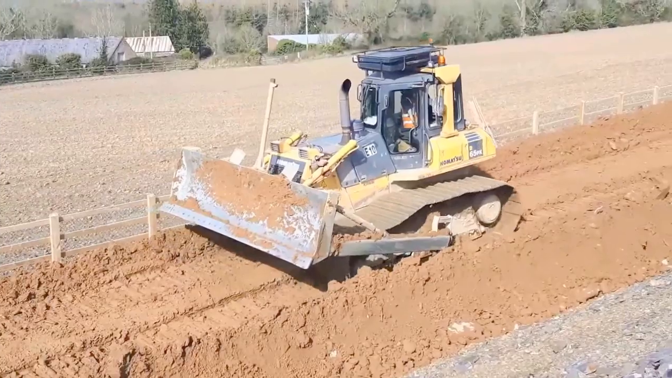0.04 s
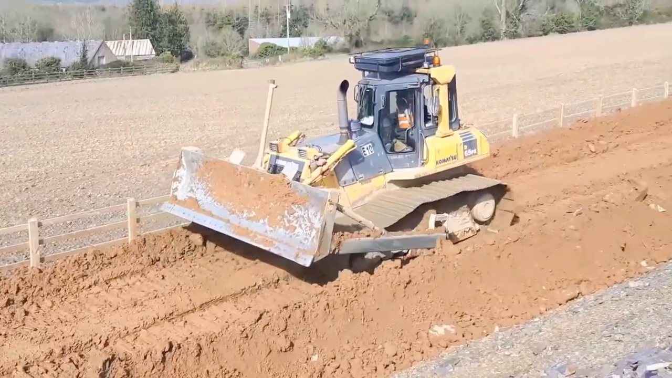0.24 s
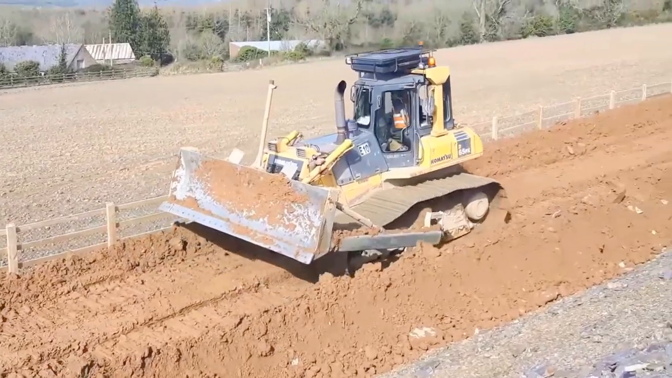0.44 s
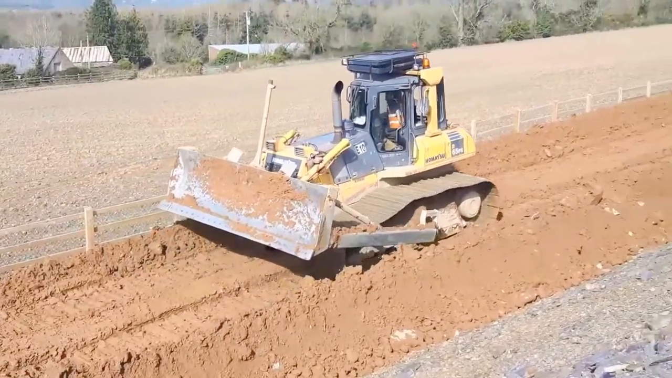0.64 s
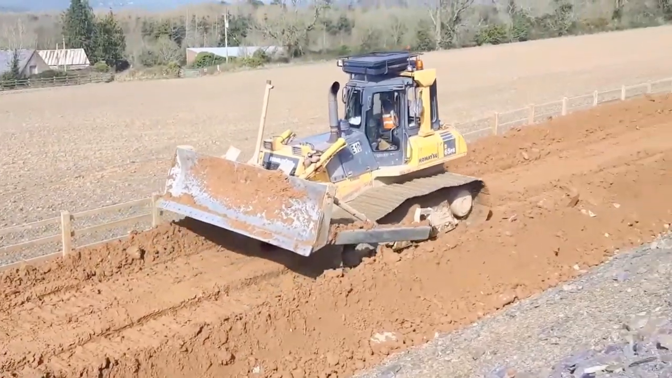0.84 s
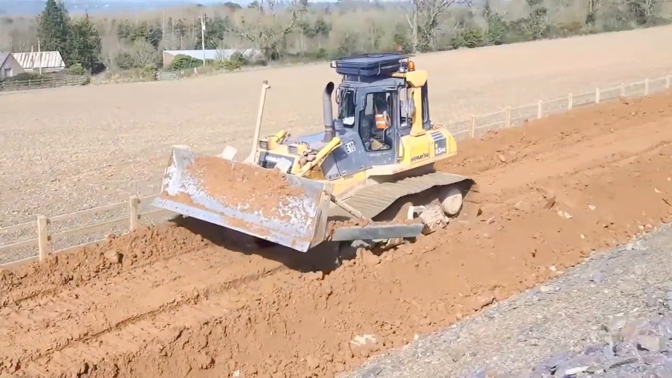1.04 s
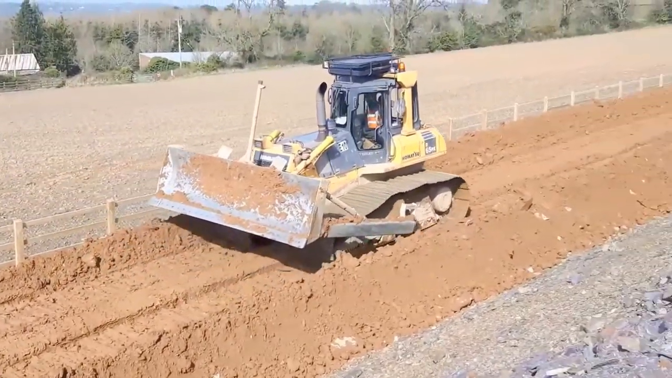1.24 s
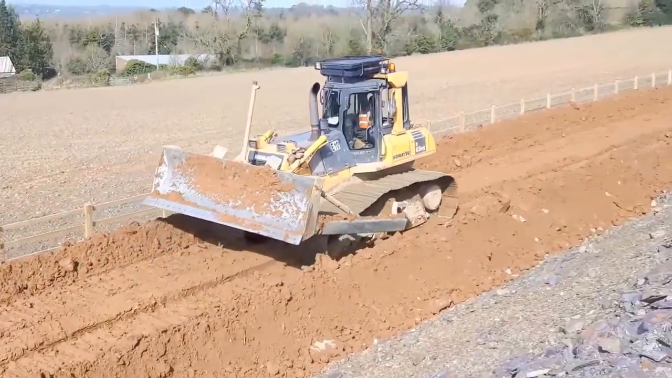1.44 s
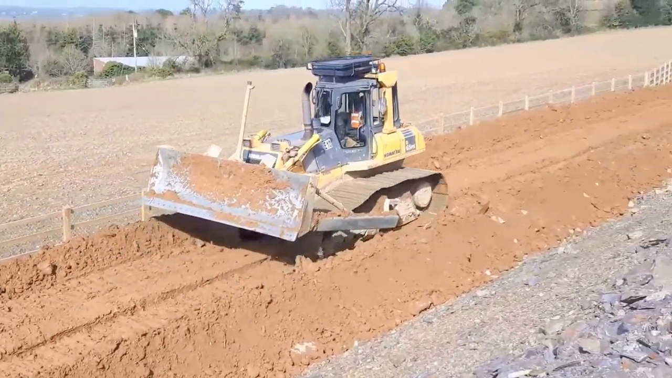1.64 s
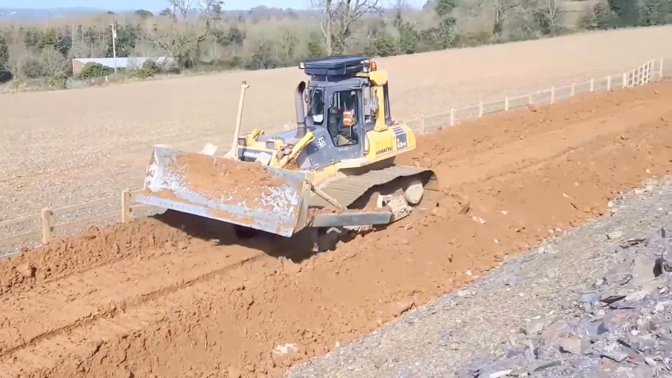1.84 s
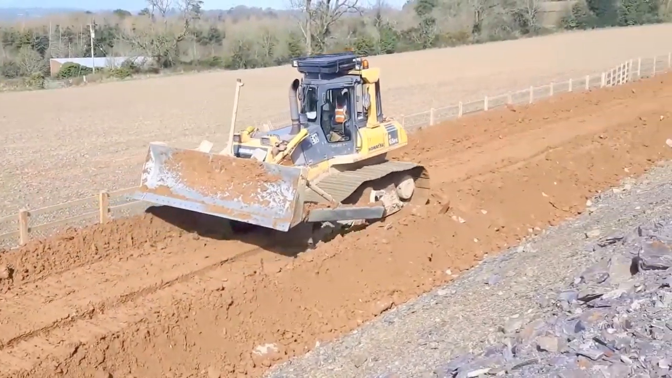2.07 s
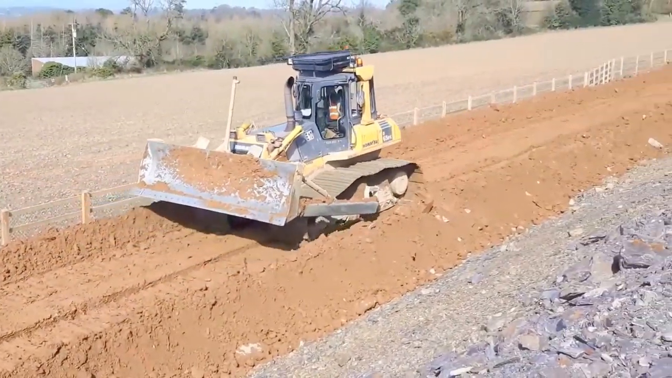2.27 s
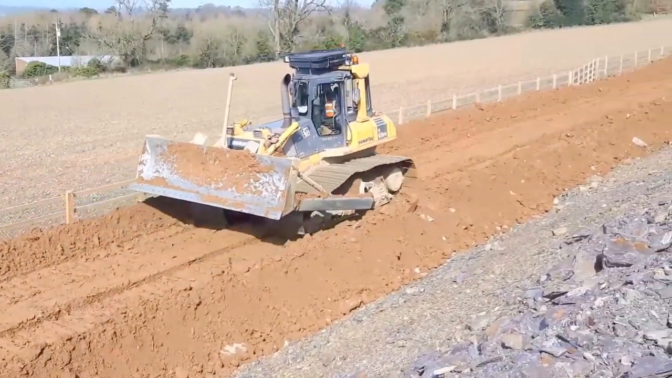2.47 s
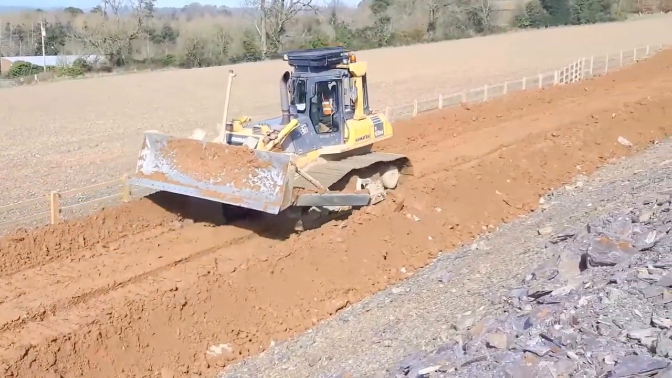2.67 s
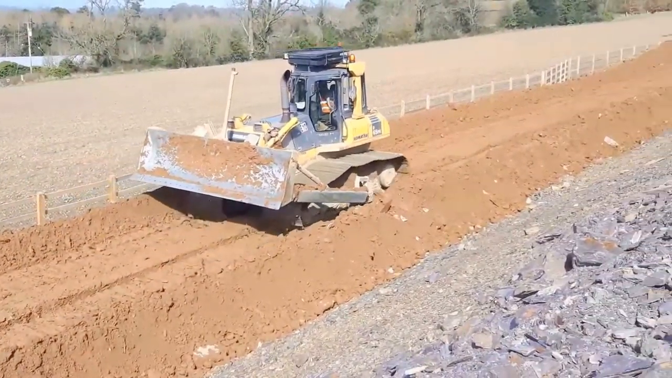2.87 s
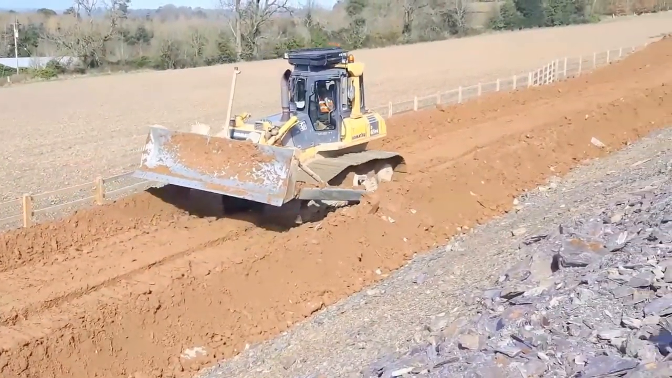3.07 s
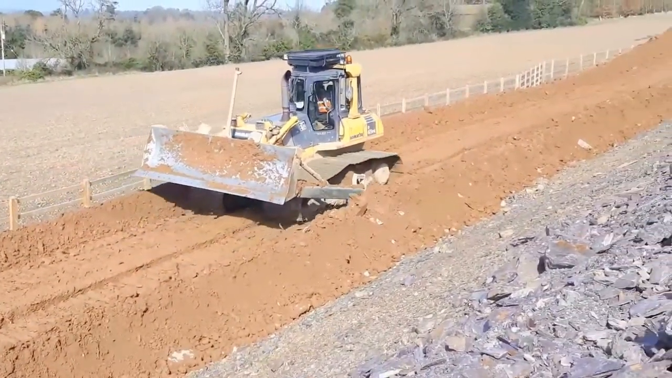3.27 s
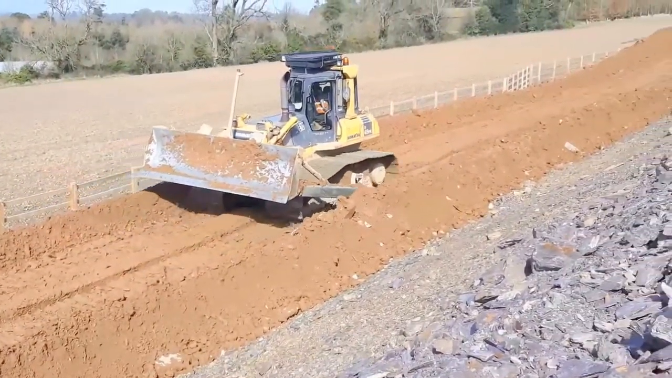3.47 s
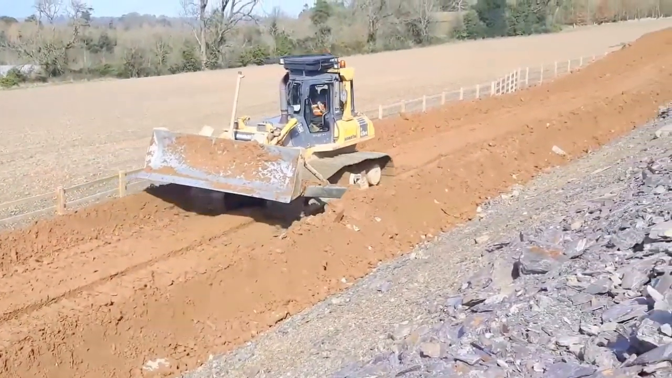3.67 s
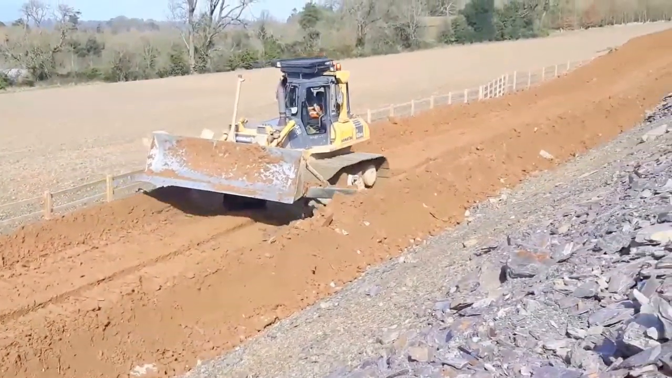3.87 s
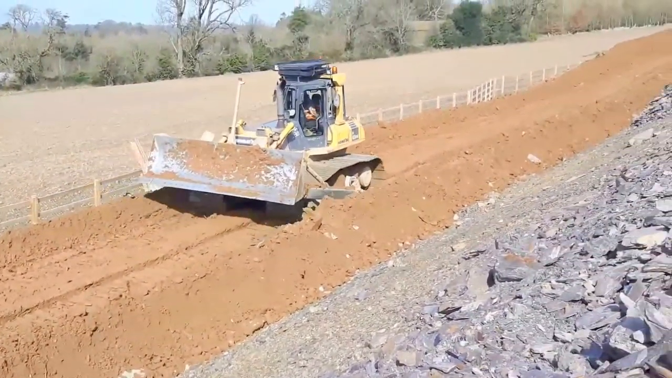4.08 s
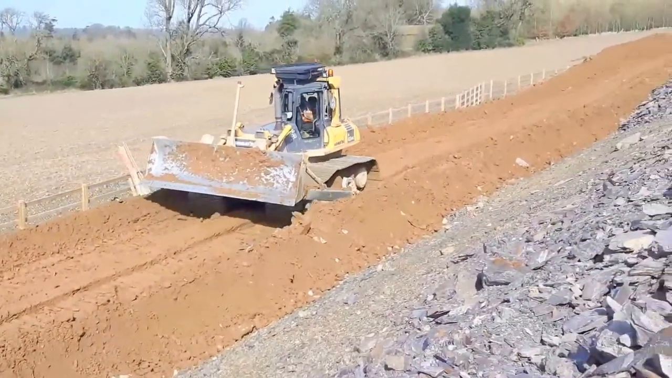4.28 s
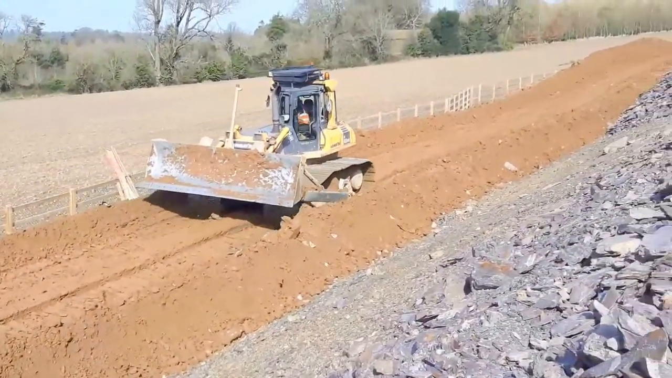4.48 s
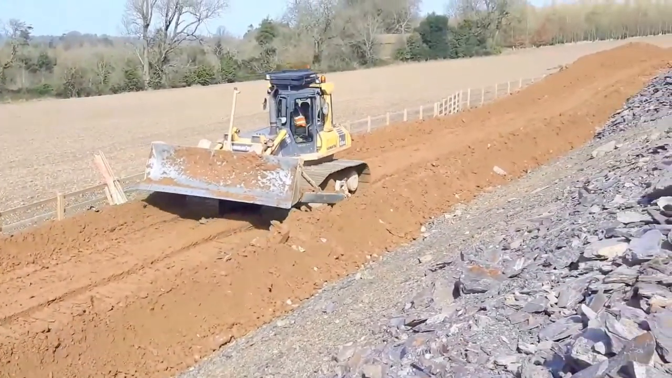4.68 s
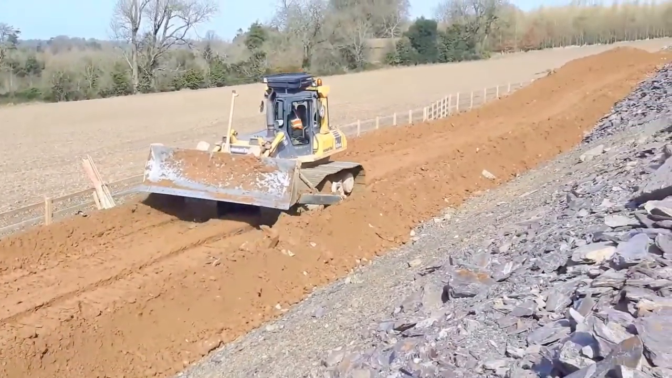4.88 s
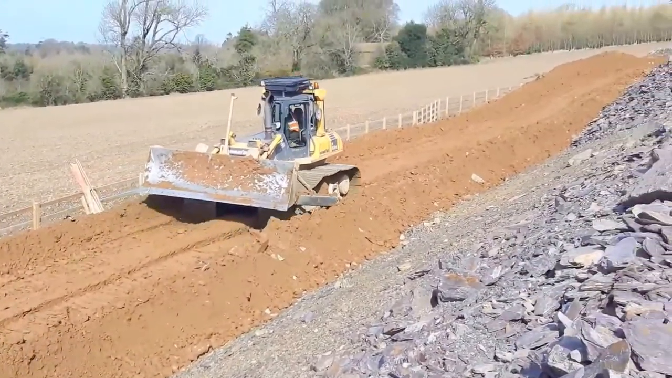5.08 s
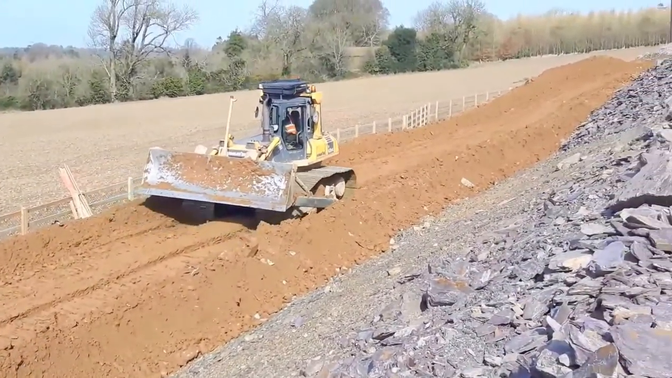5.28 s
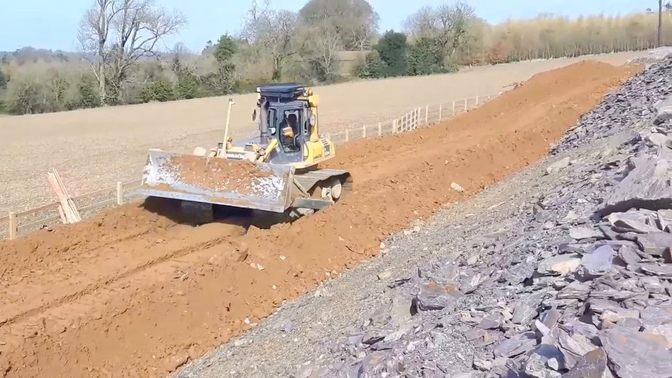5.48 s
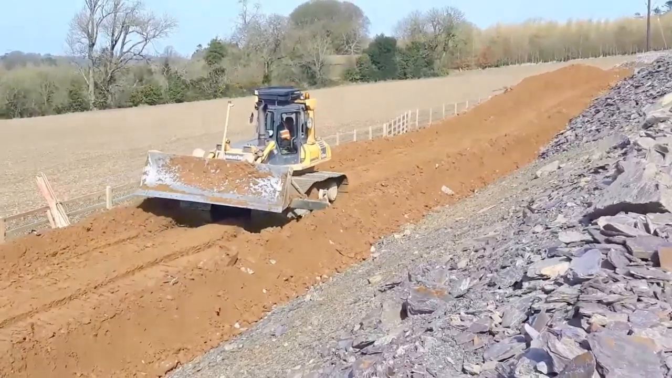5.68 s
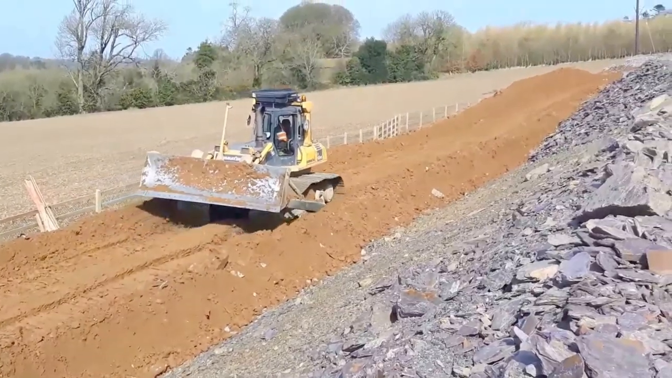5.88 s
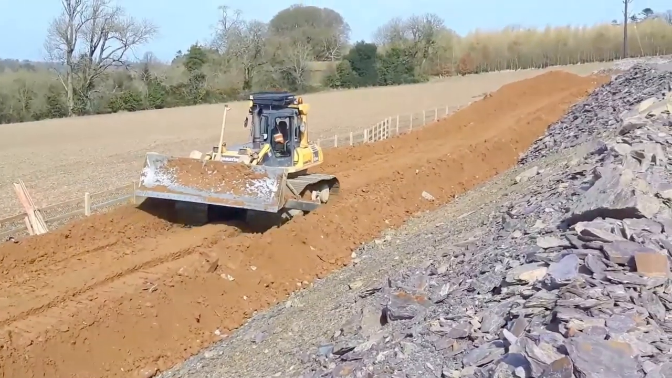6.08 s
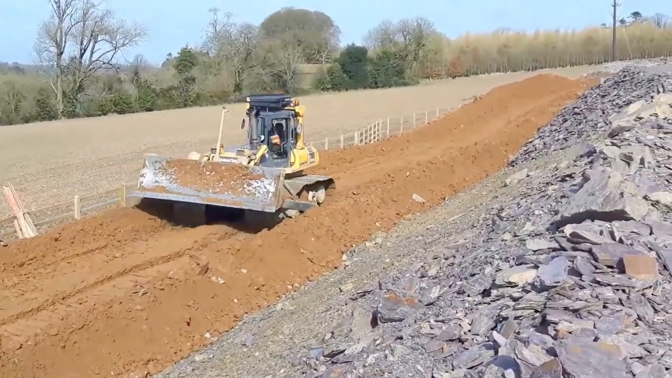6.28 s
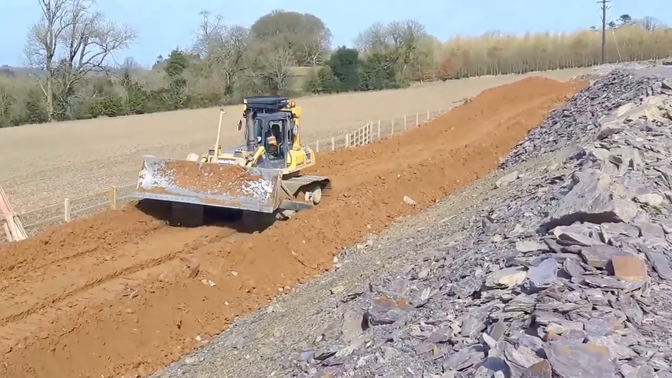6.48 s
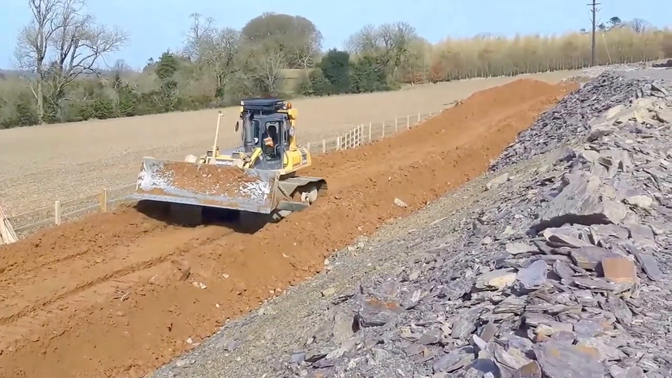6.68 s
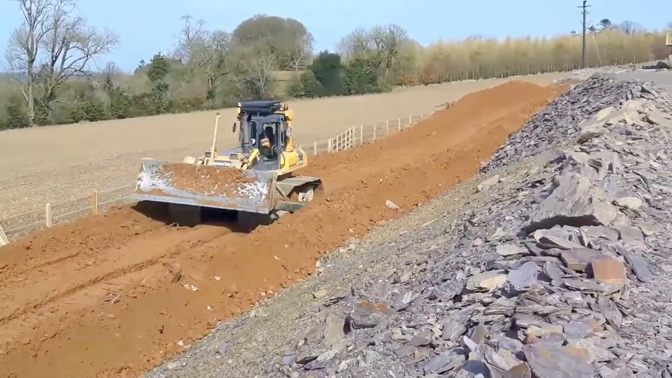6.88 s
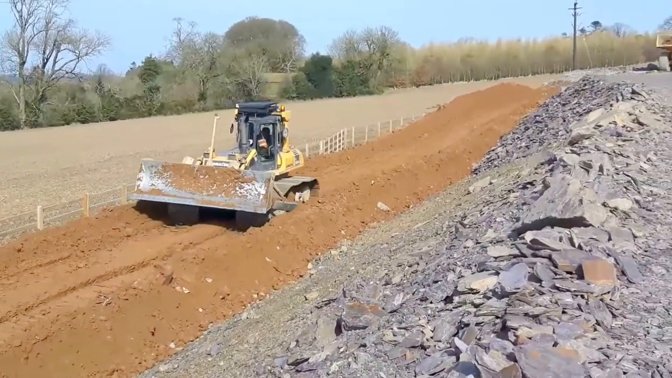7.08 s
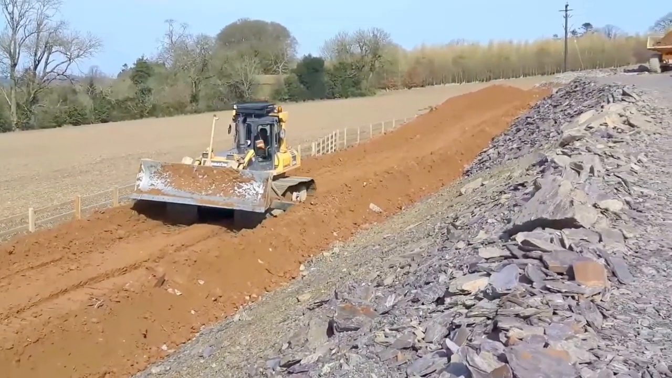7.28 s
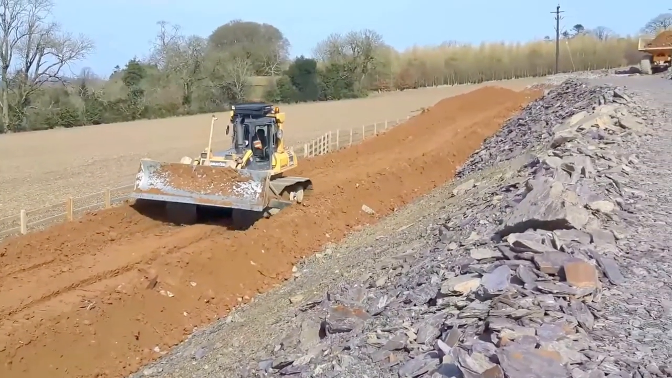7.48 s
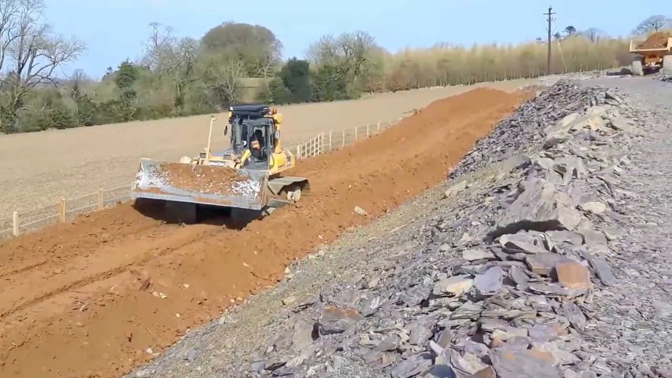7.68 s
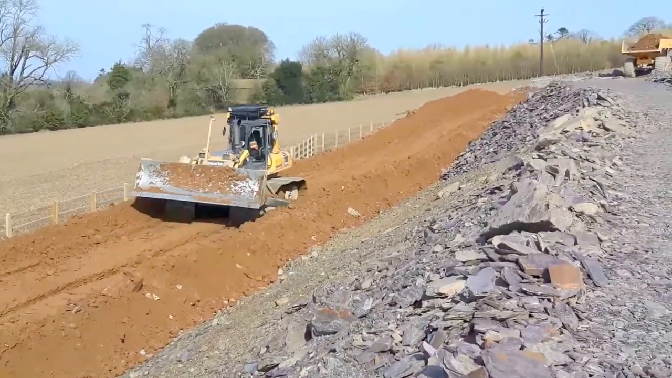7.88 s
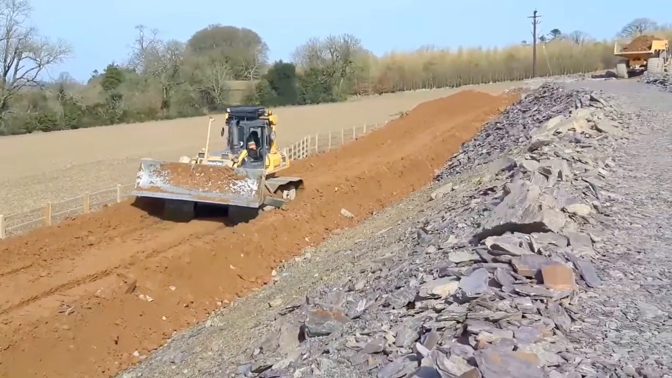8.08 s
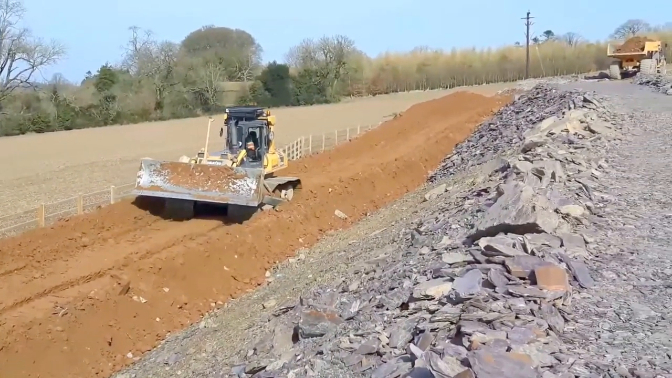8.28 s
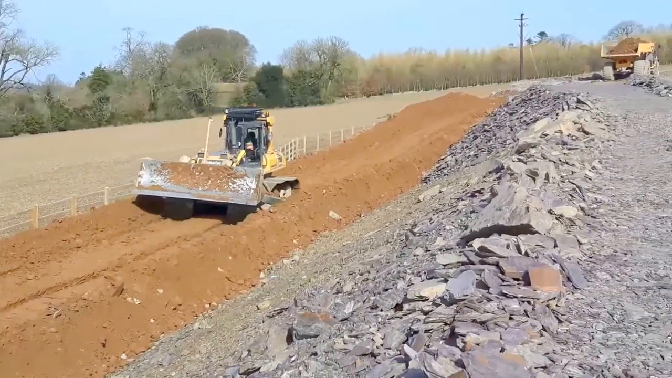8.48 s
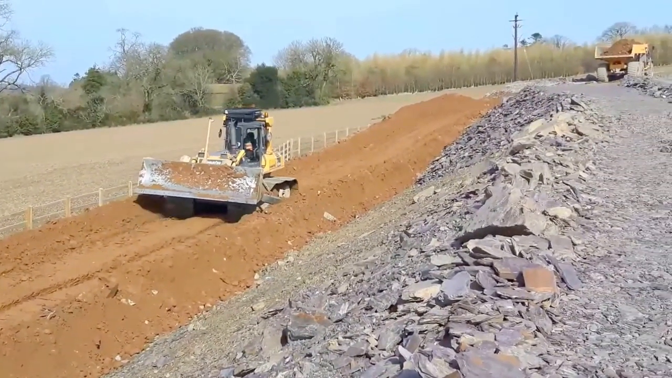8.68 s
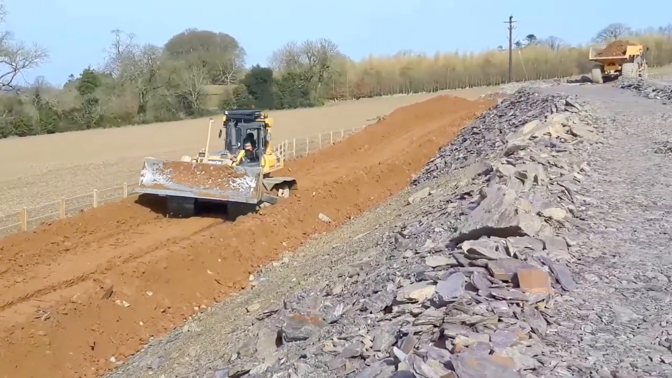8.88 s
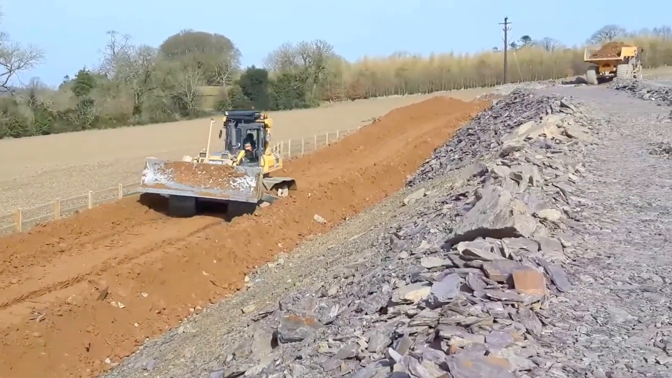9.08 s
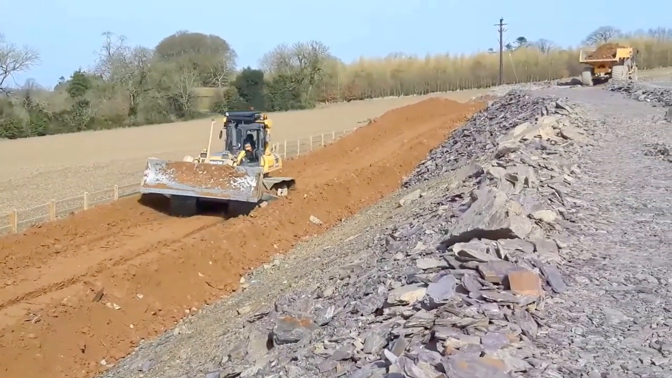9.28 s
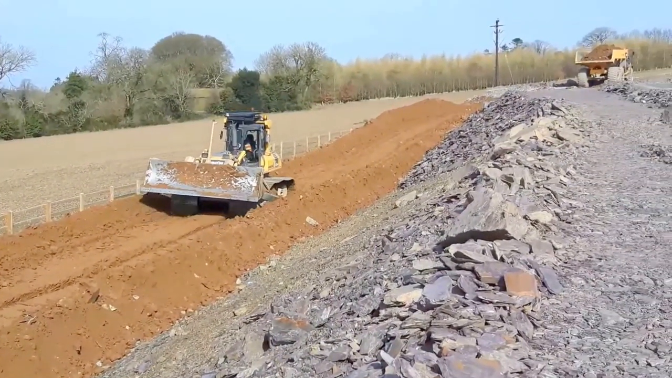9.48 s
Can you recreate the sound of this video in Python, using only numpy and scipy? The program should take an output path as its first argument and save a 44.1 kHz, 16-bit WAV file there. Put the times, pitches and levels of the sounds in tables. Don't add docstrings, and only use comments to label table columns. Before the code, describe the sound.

Steady low diesel drone and rough roar start at once, with rapid uneven metallic clanks from crawler tracks crunching over clay. Small clinks, grit ticks and a thin drive whine are clearest early. Wind bumps the microphone just past four seconds. Afterward the dozer recedes, losing treble first, with slight airy fan swells and a far haul truck droning underneath. Mono, outdoors, muffled, faint hiss.

```python
import sys
import numpy as np
from scipy import signal
from scipy.fft import rfft, irfft, next_fast_len
from scipy.io import wavfile
from scipy.ndimage import uniform_filter1d, map_coordinates

SR = 44100
rng = np.random.default_rng(int(sys.argv[2]) if len(sys.argv) > 2 else 0)


def wav_record(signal):
    frames = np.transpose(np.atleast_2d(signal))
    bounded = np.clip(frames, -1, 1)
    quanta = np.round(bounded * 32767).astype(np.int16)
    wavfile.write(sys.argv[1], SR, quanta)


def voltage_ratio(level):
    return 10 ** (np.asarray(level, float) / 20)


N = 420273

# t/s, level/dB
DISTANCE = [(0.0, -26.5), (0.72, -27), (1.38, -27.5), (1.67, -27.5), (4.3, -29), (4.7, -31), (6.87, -33),
            (7.06, -35), (8.09, -34.5), (8.73, -33), (9.21, -34), (9.53, -33)]
# f/Hz, width/Hz, level/dB
HOUSING = [(420, 300, -5), (700, 320, 0), (1000, 500, -9), (1400, 400, -17), (2050, 480, -17.5),
           (2380, 260, -25), (2900, 430, -36.5), (3640, 520, -35.5), (4330, 330, -45), (4600, 380, -48.5),
           (5240, 560, -46), (5900, 800, -59), (7250, 900, -50), (7950, 600, -58)]
# t/s, second order f/Hz, its level/dB, firing order level/dB
EXHAUST = [(0, 202, -21, -28), (1.2, 200.8, -24, -27), (2.25, 200.2, -26, -23), (3.26, 200.7, -24, -35.5),
           (3.61, 199.9, -29.5, -23.5), (3.98, 199.9, -23, -31), (4.4, 201.3, -29, -25.5),
           (5.39, 201.2, -26.5, -29.5), (5.7, 201.2, -25.5, -26), (6.6, 201.2, -28, -31.5),
           (7.25, 201.3, -27.5, -35), (7.78, 201, -27, -30), (8.5, 201.7, -27, -33.5),
           (9.53, 202.5, -29.5, -29.5)]
# f/Hz, level/dB per Hz
RUMBLE = [(15, -51), (25, -28), (43, -21), (85, -8), (151, 2), (194, -3), (246, -1.5), (397, -7.5),
          (485, -20.5), (600, -17), (780, -47), (1320, -120)]
# t/s, level/dB, length/s
FAN_SWELLS = [
    (5.103, 2, 0.22),
    (5.924, 6.5, 0.16),
    (6.6, 10, 0.18),
    (7.602, 6.5, .25),
    (9.007, 1, 0.11),
]
# t/s, shoes passed
TRACK_TRAVEL = [(.017, 0), (1.050, 10), (1.457, 14), (2.074, 20), (2.283, 22), (2.614, 25), (2.723, 26),
                (3.235, 31), (3.612, 35), (3.799, 37), (4.075, 40), (4.481, 44), (4.78, 47), (5.405, 53),
                (6.6, 65), (8.899, 88), (9.469, 94)]
# t/s, extra plate level/dB, extra pin
# level/dB
UNEVEN_SHOES = [(.017, -1.5, 9), (.225, 0, 10), (.534, -3.5, 5), (.74, 0, 7), (1.049, -1, 6),
                (1.254, -3, 10), (1.356, -2.5, 9.5), (1.457, 3, 11), (1.56, 2.5, 4), (1.866, 2, 12),
                (1.969, -2, 14), (2.073, 1.5, 8.5), (2.283, 3, 12), (2.394, 1.5, 8), (2.614, 3.5, 16),
                (2.824, -1, 7.5), (3.03, 3, 8), (3.132, 1.5, 7), (3.42, -2.5, -22), (3.612, 3.5, 13.5),
                (3.799, 0.5, 11.5), (3.988, -5, 5.5), (4.481, 2.5, 4), (4.57, -2, 6.5), (5.405, 1.5, 6),
                (5.7, 3, 5), (6.402, -1, 8.5), (6.6, 4.5, 6), (7.401, 3.5, 14), (7.892, 3.5, 10),
                (4.184, -1.5, -3), (4.276, -3, -4), (4.89, -9, -5), (5.19, -4, 3.5), (5.9, 1.5, 0),
                    (6.304, 2, 3), (7.098, 5, 0), (7.2, 0, -1.5), (7.298, 3.5, 9.5), (7.6, 2.5, -4),
                    (7.702, 3, 3), (7.805, 0, 7), (8.004, 5, 9.5), (8.102, 0, 6), (8.202, 5, 9),
                    (8.499, -2, 1), (8.7, -2, -4), (8.8, -1, -4)]
# t/s, peak level/dB, extra glint level/dB
LOOSE_PINS = [
    (2.148, -37, 11),
    (2.4334, -16, -4),
    (2.9946, -40, -2),
    (4.1235, -27.5, 10.5),
    (5.8247, -28, 1.5),
    (6.1235, -29.5, 9),
    (6.6334, -34, 1),
    (6.9366, -31, 1),
    (7.736, -30, 7),
    (8.042, -32, 7),
]
# t/s, f/Hz, level/dB
DRIVE_WHINE = [(0, 1048, -34), (1.3, 1051, -36), (2.1, 1048, -35), (2.4, 1108, -37), (2.8, 1040, -38),
               (3.1, 1058, -43), (3.45, 1135, -45), (3.7, 1130, -52), (4.3, 1050, -54), (4.5, 1045, -42),
               (5.3, 1060, -40), (5.8, 1075, -45), (6.3, 1092, -44), (7.4, 1071, -45), (8.4, 1083, -46),
               (8.9, 1102, -42), (9.25, 1108, -45), (9.53, 1115, -58)]
# t/s, f/Hz, level/dB
TURBO_WHISTLE = [(0, 11080, -82), (.8, 11200, -78), (1.3, 11200, -78), (1.6, 11180, -80), (2.3, 11190, -81),
                 (2.65, 11340, -83), (3.3, 11250, -90), (4, 11450, -85), (4.4, 11450, -87),
                 (4.9, 11300, -89), (5.3, 11200, -105), (9.53, 11200, -110)]
# t/s, peak level/dB
GRIT_TICKS = [(0.1241, -44), (0.3476, -46), (0.5362, -48), (0.8609, -52.5), (1.0874, -47), (1.4611, -55),
              (1.4985, -44), (1.707, -54), (1.867, -55), (1.933, -42), (2.0722, -57), (2.1505, -46),
              (2.1919, -45), (2.2493, -51), (2.358, -42), (2.5566, -49), (2.614, -53), (4.123, -52),
              (4.302, -46), (5.914, -47), (9.01, -51), (9.492, -45)]
# t/s, peak level/dB, f/Hz
WIND_THUMPS = [(4.19, -5, 110), (4.28, 2, 189), (4.391, -3.5, 207), (4.42, -3.5, 243), (4.441, -8, 184),
               (4.461, -5, 110), (4.49, -3, 247), (4.574, -5, 176), (4.629, -7, 129), (4.715, -11.5, 172),
               (4.738, -7.5, 149)]
# f/Hz, level/dB per Hz
TRUCK_DRONE = [(20, -63.5), (50, -10.5), (72, 5), (105, 5), (150, 11), (185, 4.5), (260, 1.5), (400, -54.5),
               (700, -120)]
# f/Hz, level/dB per Hz
MICROPHONE_HISS = [(3000, -12), (6000, 0), (9000, 1), (12000, -1), (16000, 0)]

RUMBLE_DB, RUMBLE_FADES = -19, 0.88
ROAR_DB, ROAR_FADES = -26.5, 1.07
RATTLE_DB, RATTLE_FADES = -42, 1
AIR_DB, AIR_FADES = -68, 1.7
SHOE_DB, SHOE_FADES, SHOE_SCATTER_DB = -11, 1.6, 1.4
PIN_DB, PIN_FADES, PIN_SCATTER_DB = -25, 1.2, 0.5
PLATE_HZ, PLATE_SPREAD_HZ = 685, 45
FAR_TRACK_S, FAR_TRACK_DB = .036, -14.5
PIN_HZ, PIN_SPREAD_HZ, GLINT_DB, GLINT_SCATTER_DB = 2254, 110, -26, 3.5
PIN_LAG_S, PIN_SAG_HZ_PER_DB = 0.002018, 14.5


def unit(x):
    return x / np.sqrt(np.mean(x ** 2) + 1e-20)


def curves(rows):
    s, *columns = np.transpose(rows)
    return [np.interp(np.arange(N) / SR, s, column) for column in columns]


def wobble(rate):
    knots = rng.standard_normal(int(N * rate / SR) + 4)
    return map_coordinates(knots, [np.arange(N) * rate / SR])


def tone(hz, wander_hz, rate):
    return np.sqrt(2) * np.sin(2 * np.pi * np.cumsum(hz + wander_hz * wobble(rate)) / SR)


def noise(patchy_db):
    z = signal.stft(rng.standard_normal(N), nperseg=512)[2]
    field = uniform_filter1d(rng.standard_normal(z.shape), size=5, axis=0)
    field = uniform_filter1d(field, size=8, axis=1)
    return signal.istft(z * voltage_ratio(patchy_db * unit(field)), nperseg=512)[1][:N]


def coloured(x, gain):
    m = 2 * next_fast_len(N // 2 + 8192)
    cepstrum = irfft(np.log(gain(np.fft.rfftfreq(m, 1 / SR)) + 1e-7), m)
    cepstrum[1:m // 2] *= 2
    cepstrum[m // 2 + 1:] = 0
    return irfft(rfft(x, m) * np.exp(rfft(cepstrum)), m)[:N]


def spectrum(points):
    f, db = np.transpose(points)
    return lambda hz: voltage_ratio(np.interp(np.log(hz + 1), np.log(f + 1), db))


def housed(lo_hz, hi_hz):
    inside = [row for row in HOUSING if lo_hz < row[0] < hi_hz]
    return lambda f: np.sqrt(sum(voltage_ratio(2 * db) / (1 + (1.5 * (f - centre) / width) ** 2) ** 3
                                 for centre, width, db in inside))


def bursts(times, dbs, rise, t60):
    t = np.arange(SR // 4) / SR
    marks = np.bincount(np.round(times * SR).astype(int), voltage_ratio(dbs), N)[:N]
    return signal.fftconvolve(marks, voltage_ratio(-60 * t / t60) * (1 - np.exp(-t / rise)))[:N]


def rings(times, dbs, hzs, rise, t60):
    out = np.zeros(N + SR)
    t = np.arange(SR // 8) / SR
    for s, db, hz, turn in zip(times, dbs, hzs, rng.random(len(times))):
        shape = voltage_ratio(db - 60 * t / t60) * (1 - np.exp(-t / rise)) ** 2
        out[round(s * SR):][:len(t)] += shape * np.sin(2 * np.pi * (hz * t + turn))
    return out[:N]


def fade_db(s):
    when, db = np.transpose(DISTANCE)
    return np.interp(s, when, db - db[0])


def engine():
    t = np.arange(N) / SR
    fade = fade_db(t)
    second_hz, second_db, first_db = curves(EXHAUST)
    hum = voltage_ratio(second_db + 1.8 * wobble(14)) * tone(second_hz, wander_hz=.9, rate=8)
    thud = voltage_ratio(first_db + 1.3 * wobble(9)) * tone(second_hz / 2, wander_hz=2.5, rate=9)
    rumble = unit(coloured(noise(patchy_db=1.5), spectrum(RUMBLE)))
    rumble = voltage_ratio(RUMBLE_DB + RUMBLE_FADES * fade) * rumble

    firing = 1 + .15 * np.sin(np.pi * np.cumsum(second_hz) / SR)
    shake = wobble(25)
    roar = unit(coloured(firing * noise(patchy_db=1.67), housed(0, 1800)))
    roar = voltage_ratio(ROAR_DB + ROAR_FADES * fade + 1.0 * shake) * roar
    rattle = unit(coloured(firing * noise(patchy_db=2.0), housed(1800, 6000)))
    rattle = voltage_ratio(RATTLE_DB + RATTLE_FADES * fade + 1.1 * shake) * rattle

    swell_db = sum(db * np.exp(-((t - s) / length) ** 2) for s, db, length in FAN_SWELLS)
    air = unit(coloured(noise(patchy_db=-0.2), housed(6000, SR)))
    air = voltage_ratio(AIR_DB + AIR_FADES * fade + swell_db + .8 * shake) * air
    return hum + thud + rumble + roar + rattle + air


def landings():
    when, passed = np.transpose(TRACK_TRAVEL)
    s = np.interp(np.arange(passed[-1] + 1), passed, when)
    extra_db = rng.standard_normal((len(s), 2)) * [SHOE_SCATTER_DB, PIN_SCATTER_DB]
    odd = np.array(UNEVEN_SHOES)
    which = np.abs(s - odd[:, :1]).argmin(axis=1)
    s[which] = odd[:, 0]
    extra_db[which] = odd[:, 1:]
    return s - .0015, extra_db


def tracks(shoes_s, extra_db):
    near_db = SHOE_DB + SHOE_FADES * fade_db(shoes_s)
    s = np.r_[shoes_s, shoes_s + FAR_TRACK_S]
    luck = rng.random((len(s), 3))
    is_far = np.arange(len(s)) >= len(shoes_s)
    db = np.r_[near_db + extra_db, near_db + FAR_TRACK_DB] - 3.8 * (luck[:, 0] - .5) * is_far
    hz = PLATE_HZ + PLATE_SPREAD_HZ * rng.standard_normal(len(s))
    plate = rings(s, db + 3.5, hz, rise=0.0022, t60=0.06)
    plate = plate + rings(s, db - 6.0, 1300 + 250 * luck[:, 0], rise=0.0013, t60=0.032)

    bounce_s = s + 0.0069 + .016 * luck[:, 1]
    blows = bursts(s, db - 10.5, rise=0.00055, t60=0.1)
    blows = blows + bursts(bounce_s, db - 13.0 - 8 * luck[:, 2], rise=0.00029, t60=0.06)
    crunch = coloured(blows * rng.standard_normal(N), housed(500, 1800))
    bright_crunch = coloured(blows * rng.standard_normal(N), housed(1800, 4000))
    return plate + voltage_ratio(22.0) * crunch + voltage_ratio(20.5) * bright_crunch


def pins(shoes_s, extra_db):
    loose_s, loose_db, loose_glint_db = np.transpose(LOOSE_PINS)
    s = np.r_[shoes_s + PIN_LAG_S, loose_s]
    db = np.r_[PIN_DB + PIN_FADES * fade_db(shoes_s) + extra_db, loose_db]
    luck = rng.standard_normal((len(s), 2))
    hz = PIN_HZ + PIN_SAG_HZ_PER_DB * fade_db(s) + PIN_SPREAD_HZ * luck[:, 0]
    glint_db = GLINT_DB + np.r_[GLINT_SCATTER_DB * luck[:len(shoes_s), 1], loose_glint_db]
    clink = bursts(s, db + 25, rise=0.00034, t60=0.029) * rng.standard_normal(N)
    clink = coloured(clink, housed(1800, 3200))
    glint = bursts(s, .6 * db + glint_db + 39.5, rise=0.00084, t60=0.056) * rng.standard_normal(N)
    glint = coloured(glint, housed(2700, 4500))
    return rings(s, db - 5.5, hz, rise=0.00022, t60=0.025) + clink + glint


def whines():
    drive_hz, drive_db = curves(DRIVE_WHINE)
    turbo_hz, turbo_db = curves(TURBO_WHISTLE)
    drive = voltage_ratio(drive_db - 1.5 + 2 * wobble(16)) * tone(drive_hz, wander_hz=7, rate=35)
    turbo = voltage_ratio(turbo_db - 1.0 + 2.5 * wobble(35)) * tone(turbo_hz, wander_hz=28, rate=90)
    return drive + turbo


def clatter():
    luck = rng.random((400, 2))
    hardness_db = -5 * np.log(1 - luck[:, 1] * .95)
    db = hardness_db + RATTLE_FADES * fade_db(luck[:, 0] * N / SR)
    knocks = bursts(luck[:, 0] * (N - 1) / SR, db, rise=0.00024, t60=0.019)
    return voltage_ratio(RATTLE_DB + 20.5) * coloured(knocks * rng.standard_normal(N), housed(500, 6000))


def ticks():
    s, db = np.transpose(GRIT_TICKS)
    grit = bursts(s, db + 55, rise=0.0008, t60=0.031) * rng.standard_normal(N)
    return coloured(grit, housed(5000, SR))


def wind():
    s, db, hz = np.transpose(WIND_THUMPS)
    puffs = bursts(s, db + 13.0, rise=0.0012, t60=0.068) * rng.standard_normal(N)
    pushes = rings(s, db + 3, hz, rise=.0025, t60=.05)
    return pushes + coloured(puffs, lambda f: (f / 450) / (1 + (f / 450) ** 6))


def truck():
    drone = unit(coloured(noise(patchy_db=0.5), spectrum(TRUCK_DRONE)))
    return voltage_ratio(-27.0 + 1.2 * wobble(1.9)) * drone


def microphone_hiss():
    gain = spectrum(MICROPHONE_HISS)
    return voltage_ratio(-75.5) * unit(coloured(rng.standard_normal(N), lambda f: gain(f) * (f > 2000)))


def scene():
    shoes_s, extra_db = landings()
    machine = engine() + tracks(shoes_s, extra_db[:, 0]) + pins(shoes_s, extra_db[:, 1]) + whines()
    return (machine + clatter() + ticks() + wind() + truck())[None]


def band_limit(x):
    return signal.sosfilt(signal.butter(12, 15720, fs=SR, output="sos"), x)


def record(dry):
    ceiling, knee, close_s = .8, 4, .004
    mix = (dry + microphone_hiss()) / (1 + np.abs(dry / ceiling) ** knee) ** (1 / knee)
    mix = mix * np.clip(np.arange(N)[::-1] / (close_s * SR), .15, 1)
    return band_limit(mix)


dry = scene()
out = record(dry)
wav_record(out)
```